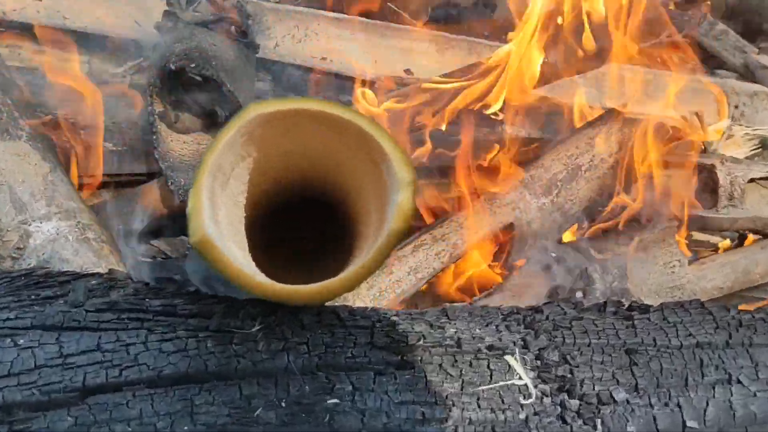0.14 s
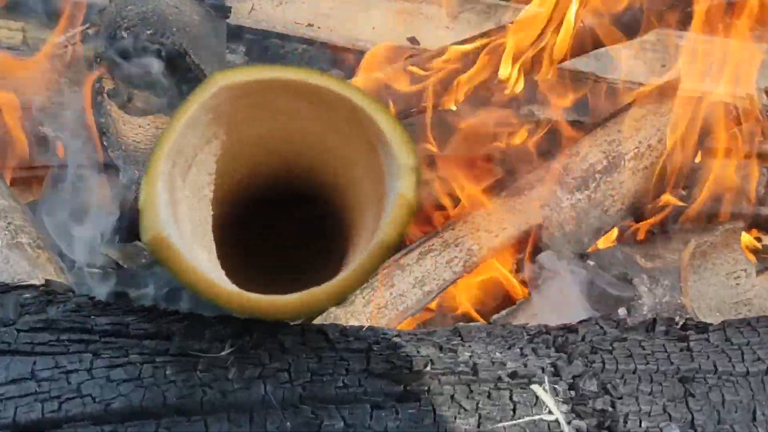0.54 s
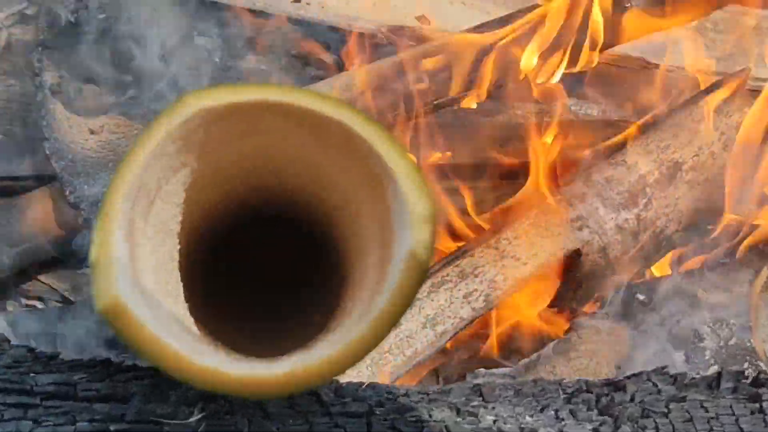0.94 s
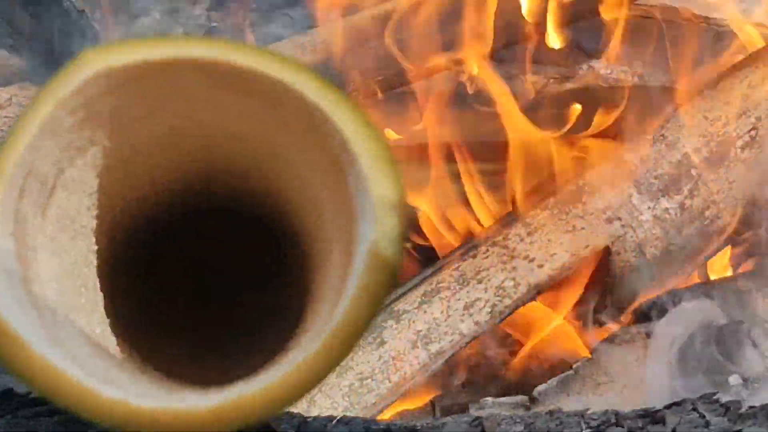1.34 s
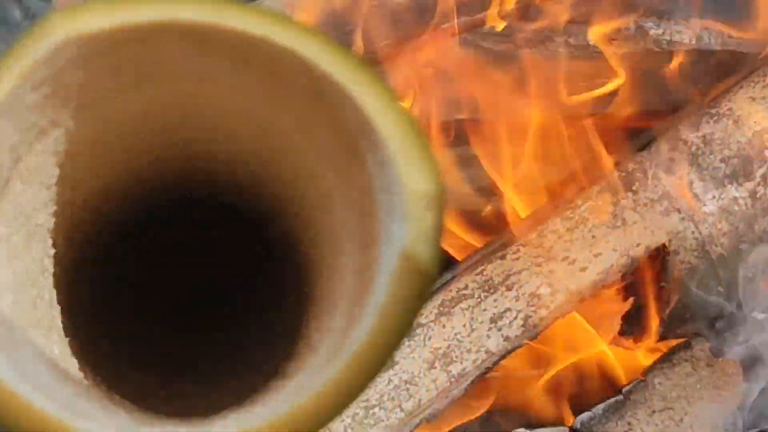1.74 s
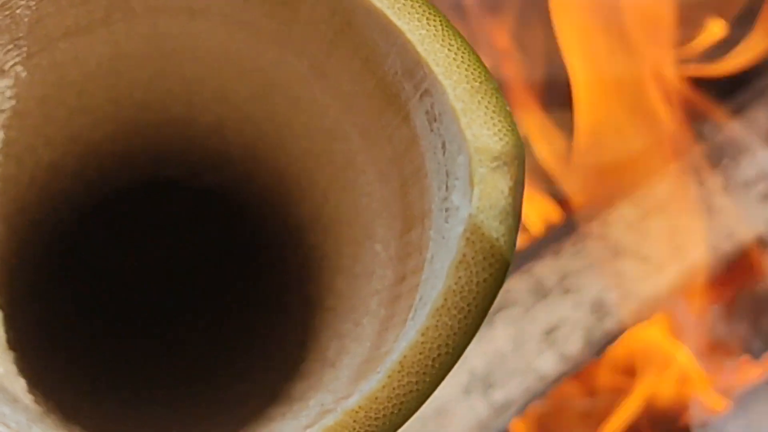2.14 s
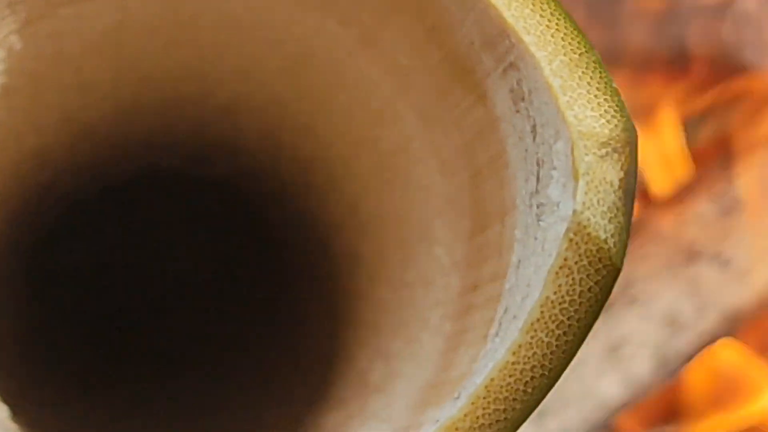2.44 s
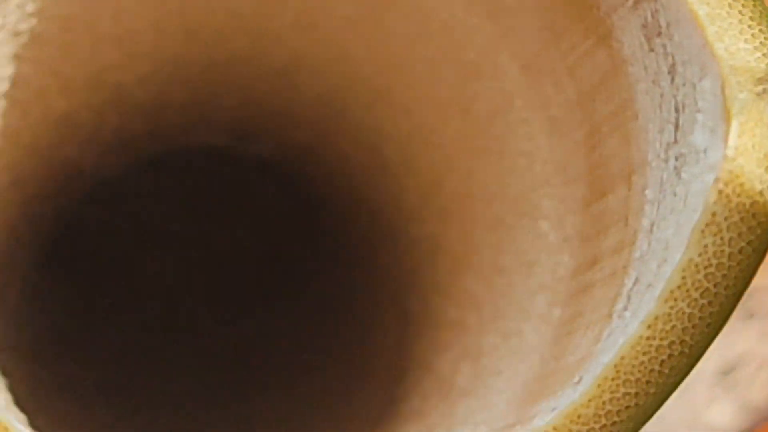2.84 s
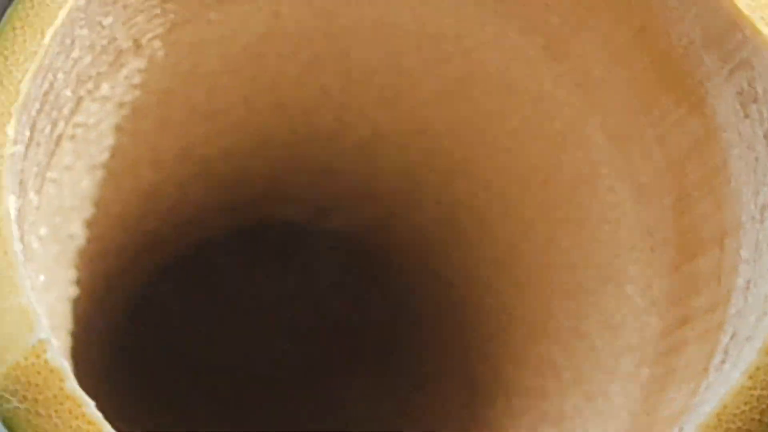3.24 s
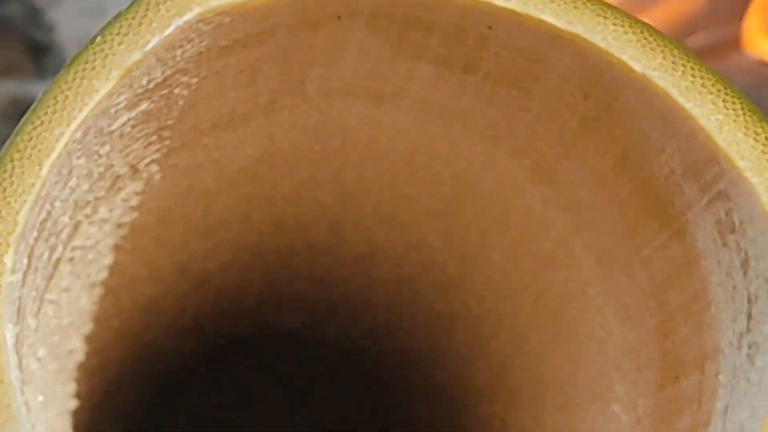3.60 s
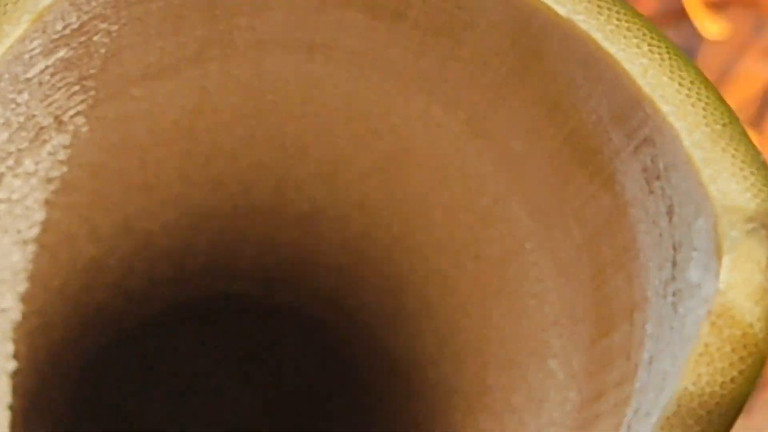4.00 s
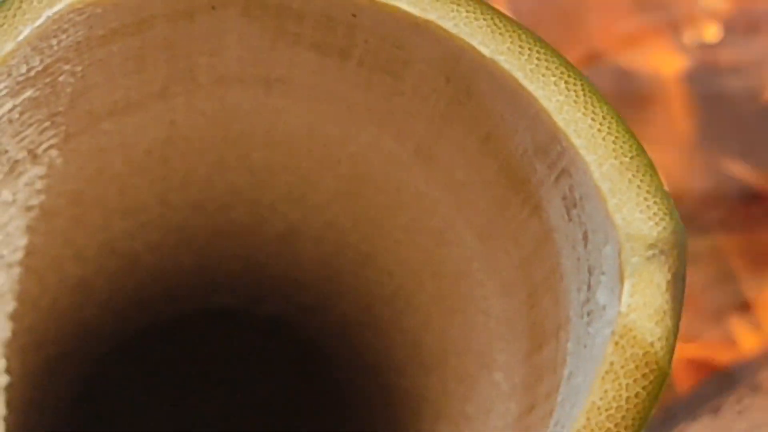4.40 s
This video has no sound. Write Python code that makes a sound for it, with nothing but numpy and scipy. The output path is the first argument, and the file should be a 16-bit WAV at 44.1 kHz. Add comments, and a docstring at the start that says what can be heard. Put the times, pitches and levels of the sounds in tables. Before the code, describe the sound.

A close, dry stereo phone pickup of a burning wood pile: crisp crackles, patchy frying hiss and quiet flame rumble. Light hollow taps accompany early snaps. A hard bamboo blow cracks and briefly booms, then smaller pops continue with faint thin whistles. Late on, a cluster of hollow knocks and log thuds shakes loose gritty crumbs, with a short steam jet between blows and squeaky sap at the end.

```python
"""Wood fire with a hollow bamboo tube

Outdoors, close to a phone whose port rings near 8 kHz: flames and sizzling sap are coloured noise,
snaps, splits and thuds are shaped noise bursts, a green bamboo tube rings as decaying sines.
Crumbs rattle as resonated clicks, sap whistles as gliding sines and jets as moving bands of noise."""
import sys
import numpy as np
from scipy import signal
from scipy.fft import rfft, irfft
from scipy.io import wavfile
from scipy.ndimage import uniform_filter1d

SR = 44100
rng = np.random.default_rng(int(sys.argv[2]) if len(sys.argv) > 2 else 0)


def unload_audio(sound):
    """Save the sound as a 16-bit wav file, at the path given as the first command line argument."""
    columns = np.transpose(np.atleast_2d(sound))
    # keep every value between -1 and 1, then stretch to whole-number steps
    steps = np.round(np.clip(columns, -1, 1) * 32767)
    wavfile.write(sys.argv[1], SR, steps.astype(np.int16))


N = 201095
PORT_LAG_S = .00018  # usual delay of the left port behind the right


def undb(db):
    """Amplitude factor of a level in dB."""
    return 10 ** (np.asarray(db) / 20)


def unit(x):
    """Scale to an rms of 1."""
    return x / np.sqrt(np.mean(x ** 2))


def colour(x, shape):
    """Filter by (f/Hz, gain/dB) points joined along log frequency; next to nothing passes outside them."""
    hz, db = np.transpose(shape)
    n = x.shape[-1]
    f = np.arange(n // 2 + 1) * SR / n + 1e-3
    gain = undb(np.interp(np.log(f), np.log(hz), db, -120, -120))
    return irfft(rfft(x) * gain, n)


def pair(n, alike, lag_s):
    """Noise at two ports: a shared part that reaches the left one later, and a part of their own."""
    alike = np.clip(alike, 0, 1)
    both, left, right = rng.standard_normal((3, n))
    shared = np.array([np.roll(both, int(round(lag_s * SR))), both])
    return np.sqrt(alike) * shared + np.sqrt(1 - alike) * np.array([left, right])


def walk(rate):
    """Wandering curve of rms 1: random levels, rate per second, slewed twice."""
    k = int(SR / rate)
    steps = np.repeat(rng.standard_normal(N // k + 1), k)
    return unit(uniform_filter1d(uniform_filter1d(steps, k), k)[:N])


def sides(pan_db):
    """Left and right gains that differ by pan_db, left minus right."""
    return undb(np.array([[pan_db], [-pan_db]]) / 2)


def add(out, s, x):
    """Mix x in from time s on."""
    i = max(int(s * SR), 0)
    out[:, i:i + x.shape[1]] += x[:, :N - i]


def level_curve(s, values, before=None):
    """Join (t/s, value) points by straight lines; the first value holds ahead of them unless before is given."""
    return np.interp(np.arange(N) / SR, s, values, before)


def flames():
    """Flames flutter: low noise, nearly alike at both ports, wavers in level."""
    # flame spectrum: f/Hz, relative density/dB
    flame_shape = [(12, 12.5), (20, -4.5), (195, 0.5), (315, -7.5), (387, -17), (437, -16), (682, -19),
                   (809, -31.5), (1200, -27), (1560, -131), (2640, -120)]
    rumble = unit(colour(pair(N, .9, PORT_LAG_S), flame_shape))
    return rumble * undb(-48 + 1.5 * walk(8)) * sides(5.2)


def patchy(x, db):
    """Split into neighbouring bands and let each wander in level."""
    lows = [0]
    for hz in (1200, 2200, 3600, 5200, 6800, 9500):
        lows.append(signal.sosfilt(signal.butter(2, hz, fs=SR, output="sos"), x))
    lows.append(x)
    return sum((hi - lo) * undb(db * walk(14)) for lo, hi in zip(lows, lows[1:]))


def sizzle():
    """Boiling sap hisses as patchy noise that tiny random ticks push up."""
    # sizzle spectrum, strongest near the port's ring: f/Hz, relative density/dB
    sizzle_shape = [(530, -6.5), (900, -7.5), (1040, -17), (1200, -13), (1340, -15.5), (2800, -9),
                    (5100, -20.5), (7490, -0.5), (8150, 9), (9880, -28.5), (14900, -25.5), (16000, -68)]
    # the sizzle swells when the wood is stirred: t/s, level/dB
    stir_levels = [(0.0, -44.5), (1.1, -47), (1.36, -48), (1.503, -45.5), (2.1, -46), (2.6, -42.5),
                   (3.17, -47), (3.5, -37.5), (3.8, -47.5), (4.1, -40.5), (4.29, -39.5), (4.462, -41.5),
                   (4.56, -43.5)]
    ticks_per_s, tick_t60_s = 45, .015
    ticks = (rng.random(N) < ticks_per_s / SR) * undb(2.5 * rng.exponential(size=N))
    spit = signal.lfilter([1], [1, -undb(-60 / (tick_t60_s * SR))], ticks)
    hiss = patchy(colour(pair(N, .6, PORT_LAG_S), sizzle_shape), 1.77)
    hiss = unit(hiss * (1 + .3 * spit) * undb(1.6 * walk(45)))
    return hiss * undb(level_curve(*np.transpose(stir_levels))) * sides(1.8)


def gliding(hz, width_hz):
    """A band of noise round a moving centre: slow complex noise on a carrier."""
    lowpass = signal.butter(4, width_hz / 2, fs=SR, output="sos")
    slow = signal.sosfilt(lowpass, rng.standard_normal((2, 2, N)))
    phase = 2 * np.pi * np.cumsum(hz) / SR
    return unit(slow[0] * np.cos(phase) + slow[1] * np.sin(phase))


def high_tone():
    """A faint high tone: narrow noise that wavers in pitch and level."""
    # centre f/Hz, width/Hz, level/dB
    hz, width_hz, db = (8150, 180, -55)
    return gliding(hz + 25 * walk(6), width_hz) * undb(db + 1.5 * walk(30)) * sides(5.0)


def cracks():
    """Fibres tear in a quick volley: bright snap, woody split, and the log's dull thud just behind."""
    # cracks: t/s, snap level/dB, split re snap/dB, thud re snap/dB, snap t60/s, left minus right/dB
    crack_list = [(0.069, -31, -9, -20, 0.047, 1.5), (0.346, -27, -11, -31, 0.054, 0),
                  (0.359, -32.5, -10, -40, 0.032, 9), (0.463, -33, -17, -40, 0.0058, 5.5),
                  (0.531, -41, -18, -40, 0.014, 4), (0.636, -38, -10, -31, 0.069, -2),
                  (0.643, -27.5, -17.5, -40, 0.062, -1), (0.698, -46, -30, -33, 0.012, 16),
                  (0.731, -46, -26, -31, 0.022, 4), (0.839, -52, -7, 2, 0.022, -2),
                  (0.941, -28, -13, -37, 0.05, -0.5), (1.172, -1, -15, -23.5, 0.0074, 5.5),
                  (1.185, -42, -11, -30, 2.4, 1), (1.221, -33.5, -10, -9, 0.077, 10.5),
                  (1.249, -34.5, -4, -24, 0.047, 5), (1.358, -44, -2, -20, 0.028, 6),
                  (1.55, -29, -10, -16.5, 0.065, -1.5), (1.573, -50, 3.5, -18.5, 0.028, 8),
                  (1.679, -32.5, -24, -15, 0.014, 3.5), (1.7351, -40.5, 8, 4, 0.017, 1),
                  (1.853, -38, -25, -40, 0.017, -2), (1.8753, -34, -4, -30, 0.026, 1.5),
                  (2.11, -43.5, -28, -12, 0.16, -1), (2.241, -40, -23, -30, 0.012, -1),
                  (2.286, -39.5, -11.5, -6.5, 0.056, -0.5), (2.443, -39.5, -33, -34, 0.037, 4),
                  (2.556, -37.5, 4, -2, 0.013, 0), (2.618, -35, -17, -38, 0.054, -2.5),
                  (2.736, -41, -3.5, -3, 0.033, 1), (2.882, -39, -7.5, -6.5, 0.022, -1),
                  (2.928, -45.5, -6.5, 0, 0.033, 4), (3.122, -26.5, -40, -46, 0.0097, 6),
                  (3.163, -28, -22.5, -21, 0.016, 4), (3.321, -46, -5, -30, 0.036, 2),
                  (3.337, -7.5, -7.5, -19.5, 0.02, 5), (3.45, -20, -1.3, 7.5, 0.021, 1),
                  (3.464, -27, -4.5, 11, 0.06, -2), (3.484, -43.5, 1, 19.5, 0.071, 7),
                  (3.506, -44, -4, 12, 0.091, 1), (3.532, -54, 6, 11, 0.15, 3),
                  (3.58, -44, -22, -30, 0.16, -17), (3.741, -46, -7.5, 4, 0.36, 1),
                  (3.886, -23.5, -6, -19.5, 0.072, -1), (3.908, -33.5, -10, -4, 0.33, 1),
                  (3.944, -27.5, -11, -24, 0.06, -18), (3.9614, -8.5, -7, -6.5, 0.014, 5),
                  (4, -19, -6, -5.5, 0.017, 1), (4.02, -33.5, 0, 2, 0.055, 0),
                  (4.046, -42.5, -8, 6, 0.29, 13), (4.0739, -15.5, -8.5, -5.5, 0.036, 0.5),
                  (4.095, -34.5, -10, 2, 0.091, 1), (4.131, -30.5, -15, -4.5, 0.41, -2.5),
                  (4.152, -19, -31, -17.5, 0.01, 5), (4.226, -30.5, -8, -14, 0.057, -2),
                  (4.242, -34, -20, -30, 0.015, 0), (4.299, -30.5, -21, -18.5, 0.044, -2),
                  (4.356, -29.5, -24, -40, 0.0087, -8.5), (4.382, -36, -25, -40, 0.008, -5),
                  (4.461, -50, -9, -26, 0.017, -10), (4.536, -34.5, -7.5, -9.5, 0.1, -1)]
    # spectrum of the bright snap: f/Hz, relative density/dB
    snap_shape = [(1800, -103), (3200, -11), (4300, -10.5), (5500, -9), (7600, 3), (8900, -4.5),
                  (10500, -19.5), (13400, -24), (16000, -40)]
    # spectrum of the woody split: f/Hz, relative density/dB
    split_shape = [(500, -61), (1000, -1.5), (1250, 2.5), (2800, 4), (4300, -8), (7500, -5.5)]
    # spectrum of the log's thud: f/Hz, relative density/dB
    thud_shape = [(88, -69), (150, -6.5), (290, 3), (420, -0.5), (612, 0.5), (754, 0.5), (857, -0.5),
                  (975, -1.5), (1430, -14), (1600, -55), (2080, -53), (3520, -120)]
    thud_t60_s = 0.091
    lead = 512  # samples of room ahead of the burst for the filter's spread
    out = np.zeros((2, N))
    for s, db, split_db, thud_db, t60, pan_db in crack_list:
        n = 8192 if t60 < .3 else 32768
        t = np.arange(n) / SR
        # a longer tear starts more slowly
        rise = np.clip(0.065 * t60, 2e-4, 0.0075)
        hold = 0.56 * rise
        # each crack comes from its own direction
        lag_s = PORT_LAG_S * (1 + 0.64 * rng.standard_normal())
        # the volley is uneven: fibre sizes change every millisecond or so, a sudden snap less so
        uneven_db = 2.0 * min(rise / 0.0022, 1)
        sizes = undb(uneven_db * rng.standard_normal(n // 64))
        volley = uniform_filter1d(np.repeat(sizes, 64), size=24)
        split_t60 = max(t60, np.sqrt(t60 * thud_t60_s))
        # lower parts are more alike at both ports, start later and rise more slowly
        # shape, level re snap/dB, alike 0-1, rise/s, t60/s, delay/s
        parts = ((snap_shape, 0, .6, rise, t60, 0),
                 (split_shape, split_db, .7, rise + 0.00028, split_t60, .0005),
                 (thud_shape, thud_db, .9, rise + 0.0051, thud_t60_s, .0015))
        for shape, part_db, alike, up, down, late in parts:
            # rise, hold at full strength, then decay; the power below 1 makes the onset quick
            decay_db = -60 * np.maximum(t - up - hold, 0) / max(down, .005)
            swell = np.clip(t / up, 0, 1) ** 0.81 * undb(decay_db)
            torn = pair(n, alike, lag_s) * swell * volley
            burst = colour(np.roll(torn, lead, axis=1), shape)
            # peaks stand about twice the rms under the swell
            burst = burst * np.sqrt(np.sum(swell ** 2) / np.sum(burst.mean(0) ** 2)) / 2
            add(out, s + late - lead / SR, burst * undb(db + part_db) * sides(pan_db))
    return out


def ring(length, hz, db, t60, swell):
    """One mode, length samples long: a sine that builds up over swell seconds and dies away."""
    t = np.arange(length) / SR
    return undb(db - 60 * t / t60) * np.sin(2 * np.pi * hz * t) * np.clip(t / swell, 0, 1) ** 2


def taps():
    """Light hollow taps further off: a single mode each."""
    # taps: t/s, level/dB
    tap_list = [(0.071, -38), (0.351, -34), (0.646, -40), (0.833, -46.5), (0.942, -38.5), (1.251, -48),
                (1.552, -41)]
    out = np.zeros((2, N))
    for s, db in tap_list:
        add(out, s, ring(SR // 3, 482, db, 0.17, 0.0032) * sides(0.98))
    return out


def wall_knocks():
    """Hard knocks ring the wall modes of the tube; the place of the blow favours two pitches."""
    # wall modes of the tube: f/Hz, free t60/s
    wall_modes = [(285, .06), (357, .07), (431, .14), (474, .2), (522, .14), (570, .08), (690, .14),
                  (782, .14), (875, .09), (1000, .08), (1095, .05), (1210, .04), (1600, .04), (1800, .035)]
    # knocks: t/s, level/dB, share of the free t60, lower favoured f/Hz, upper favoured f/Hz,
    # upper re lower/dB, left minus right/dB
    knock_list = [(1.172, -16, 0.59, 373, 1094, 3, 9.5), (1.177, -25, 0.63, 680, 900, 0, 4),
                  (1.1727, -21, 0.36, 516, 1620, 5, 6.3), (3.3365, -23, 0.5, 343, 1040, 5, 13),
                  (3.338, -20.5, 0.97, 519, 790, -12, 11), (3.453, -7.5, 0.49, 353, 742, -4.5, 4.9),
                  (3.466, -29, 0.49, 300, 592, 17.5, 3.7), (3.478, -24, 0.8, 600, 850, 0, 6.1),
                  (3.493, -30, 0.44, 330, 700, 4, 4.4), (3.508, -29, 0.28, 574, 890, 6, 4.8),
                  (3.531, -28, 0.38, 410, 775, -10, 4), (3.963, -17, 0.56, 796, 1050, 0.5, 5.2),
                  (3.974, -29.5, 1, 280, 500, 0, 6.1), (3.988, -30.5, 0.5, 485, 810, -1, 6.8),
                  (4.003, -28.5, 0.74, 820, 1090, -13, 4.4), (4.027, -31.5, 0.34, 447, 830, 0, 4.9),
                  (4.049, -43, 0.92, 295, 800, -11, 4), (4.064, -42, 0.59, 325, 480, -1, 4),
                  (4.077, -28.5, 0.3, 298, 1000, 9, 4), (4.09, -32.5, 0.58, 500, 1060, -14, 4.4),
                  (4.103, -29, 0.45, 550, 755, -4, 4.7), (4.288, -34, 0.31, 535, 666, 1.5, 3.8)]
    place_octaves, node_share, swell_s = 0.17, 0.083, 0.0022

    def near(f, hz):
        """Bell-shaped weight in octaves from a favoured pitch."""
        return np.exp(-(np.log2(f / hz) / place_octaves) ** 2)

    out = np.zeros((2, N))
    for s, db, free, low_hz, high_hz, high_db, pan_db in knock_list:
        modes = 0
        for k, (f, t60) in enumerate(wall_modes):
            # modes far from both favoured pitches lie near a node and are struck weakly
            strength = node_share + near(f, low_hz) + undb(high_db) * near(f, high_hz)
            # neighbours start in opposite phase
            modes = modes + (-1) ** k * strength * ring(SR // 4, f, db, free * t60, swell_s)
        # the left port hears the knock a little later
        ports = np.array([np.roll(modes, int(PORT_LAG_S * SR)), modes])
        add(out, s, ports * sides(pan_db))
    return out


def air_column():
    """Blows set the air in the tube ringing, nearer the left port; it needs a few cycles to build up."""
    # blows: t/s, level/dB, f/Hz, t60/s
    blow_list = [(1.184, -34.5, 146.6, 0.96), (3.34, -29, 146.4, 0.68), (3.459, -19, 163, 0.19),
                 (3.561, -42.5, 165, 0.92), (3.961, -42, 144.2, 1.05)]
    out = np.zeros((2, N))
    for s, db, hz, t60 in blow_list:
        add(out, s, ring(SR, hz, db, t60, 0.024) * sides(9.3))
    return out


def crumbs():
    """Charcoal crumbs slide and rattle: dense clicks of many sizes excite short resonances."""
    # the rattle swells after the hard knocks: t/s, level/dB
    slide_levels = [(1.17, -75), (1.2, -49.5), (1.3, -50), (1.4, -54.5), (1.5, -64), (1.7, -72),
                    (3.44, -71), (3.47, -44), (3.53, -51), (3.62, -59), (3.88, -63), (3.97, -44),
                    (4.05, -48), (4.1, -48), (4.2, -53.5), (4.56, -61)]
    # crumb resonances: f/Hz, relative level/dB
    crumb_modes = [(1500, -2.5), (2000, -1), (2600, 0.5), (3300, 0.5), (4100, -2.5), (5000, -2.5),
                   (6000, 4)]
    hits_per_s, t60_cycles, spread_db = 300, 14, 2.5  # for each resonance
    out = 0
    for hz, db in crumb_modes:
        when, size, side = rng.random((int(hits_per_s * N / SR), 3)).T
        strength = undb(-spread_db * np.log(1 - size))
        hits = np.zeros((2, N))
        hits[:, (when * N).astype(int)] = strength * np.array([side + .5, 1.5 - side])
        r = undb(-60 * hz / (t60_cycles * SR))  # pole radius: loss per sample
        poles = [1, -2 * r * np.cos(2 * np.pi * hz / SR), r ** 2]
        out = out + undb(db) * unit(signal.lfilter([1, 0, -1], poles, hits))
    slide_db = level_curve(*np.transpose(slide_levels))
    return unit(out) * undb(slide_db + 2.0 * walk(30)) * sides(1.7)


def whistles():
    """Sap whistles thinly: short gliding sines that waver in pitch and flicker in level."""
    # whistles: start t/s, end t/s, start f/Hz, middle f/Hz, end f/Hz, rms wobble/Hz, level/dB
    whistle_list = [(2.06, 2.24, 3312, 3315, 3318, 8, -65), (2.23, 2.28, 3325, 3322, 3320, 8, -66),
                    (2.26, 2.38, 3495, 3492, 3488, 10, -67), (2.39, 2.5, 4335, 4345, 4365, 14, -62),
                    (2.48, 2.55, 4370, 4385, 4390, 20, -64), (2.43, 2.54, 3490, 3490, 3490, 10, -68),
                    (2.555, 2.7, 5470, 5470, 5500, 16, -59), (3.714, 3.752, 7100, 7820, 6950, 40, -45),
                    (4.245, 4.32, 5750, 5850, 5800, 70, -57), (4.3, 4.395, 5780, 5850, 5650, 70, -57),
                    (4.38, 4.455, 5800, 5950, 5900, 70, -55), (4.31, 4.45, 5300, 5220, 5300, 70, -57),
                    (4.478, 4.512, 5950, 6030, 6030, 45, -53), (4.51, 4.56, 5700, 5850, 5900, 80, -56)]
    breathy_per_hz = .007  # a whistle that wobbles more is also more breathy
    flicker, waver, breath = walk(60), walk(130), walk(500)
    out = np.zeros((2, N))
    for k, (a, b, from_hz, mid_hz, to_hz, wobble_hz, db) in enumerate(whistle_list):
        i = np.arange(int(a * SR), min(int(b * SR), N))
        u = (i / SR - a) / (b - a)
        # a parabola through start, middle and end pitch
        bend_hz = mid_hz - (from_hz + to_hz) / 2
        hz = from_hz + (to_hz - from_hz) * u + bend_hz * 4 * u * (1 - u)
        # each whistle reads its own stretch of the random curves
        own = (i + k * SR // 3) % N
        fade = np.clip(np.minimum(u, 1 - u) / .25, 0, 1)
        on = fade * (1 + breathy_per_hz * wobble_hz * breath[own])
        tone = np.sqrt(2) * np.sin(2 * np.pi * np.cumsum(hz + wobble_hz * waver[own]) / SR)
        out[:, i] += undb(db + 2.0 * flicker[own]) * on * tone
    return out


def steam_jet():
    """Steam jets from the sap: a broad and a narrower band of noise glide together."""
    # jet: t/s, centre f/Hz, broad hiss as share of power 0-1, level/dB
    s, hz, broad, db = np.transpose([(3.725, 7340, .6, -73), (3.751, 7240, .7, -38.5),
                                     (3.8, 7400, .8, -44.5), (3.83, 6940, .95, -41), (3.87, 6800, .95, -45),
                                     (4.0, 6400, .9, -57), (4.199, 5700, .6, -49), (4.3, 5400, 0.2, -54),
                                     (4.45, 5350, 0.2, -55), (4.56, 5550, 0.52, -48)])
    hz, broad = level_curve(s, hz), np.clip(level_curve(s, broad), 0, 1)
    jet = np.sqrt(broad) * gliding(hz, 1400) + np.sqrt(1 - broad) * gliding(hz, 550)
    # next to silent before the first point
    return jet * undb(level_curve(s, db, -120) + 2.0 * walk(120))


def echoes(x):
    """Logs close by scatter each crack back at once; ground and trees add a longer diffuse tail."""
    t = np.arange(SR // 2) / SR
    response = 0
    # level/dB, t60/s, swell/s
    for db, t60, swell in ((-5.5, 0.037, .002), (-19.5, 0.74, .025)):
        tail = rng.standard_normal((2, len(t))) * undb(-60 * t / t60) * np.clip(t / swell, 0, 1)
        energy = np.sum(tail ** 2, axis=1, keepdims=True)
        response = response + undb(db) * tail / np.sqrt(energy)
    return signal.fftconvolve(x, response, axes=1)[:, :N]


def scene():
    """Mix the fire, the tube, the taps and their echoes."""
    steady = flames() + sizzle() + high_tone()
    snaps = cracks() + crumbs()
    rings = taps() + wall_knocks() + air_column()
    steam = whistles() + steam_jet()
    # the echoes of the tube's rings and the taps are weaker, so their pitches stay clear
    return steady + snaps + rings + steam + echoes(snaps + .5 * rings)


def record(dry):
    """The phone rounds the loudest peaks and cuts the top above 16.2 kHz."""
    rounded = np.tanh(1.064 * dry) / 1.156
    return signal.sosfilt(signal.ellip(12, .2, 100, 16200, fs=SR, output="sos"), rounded)


dry = scene()
out = record(dry)
unload_audio(out)
```